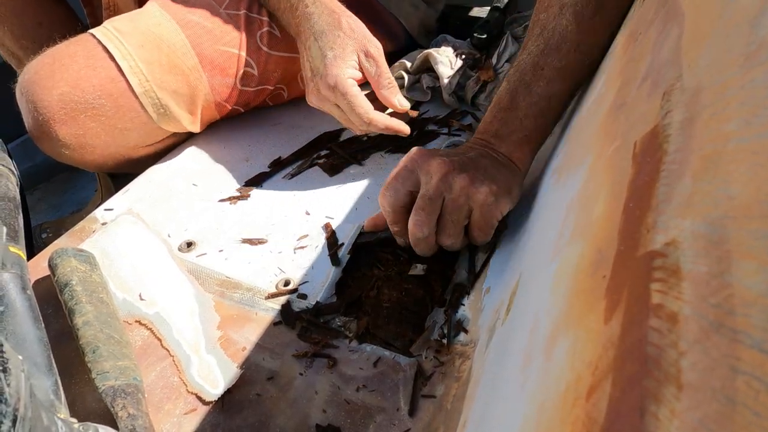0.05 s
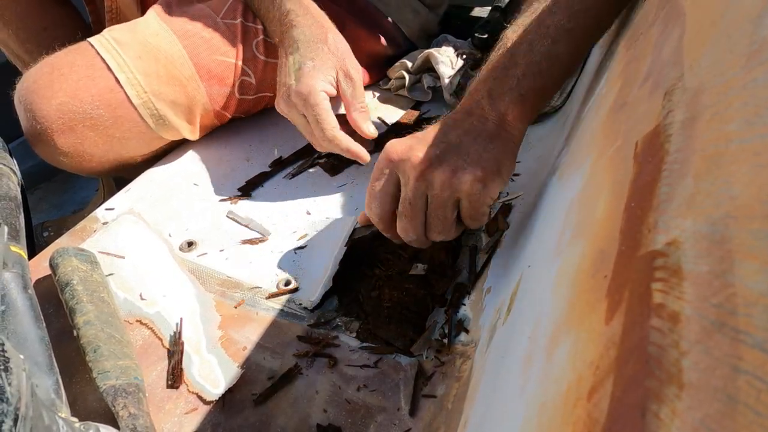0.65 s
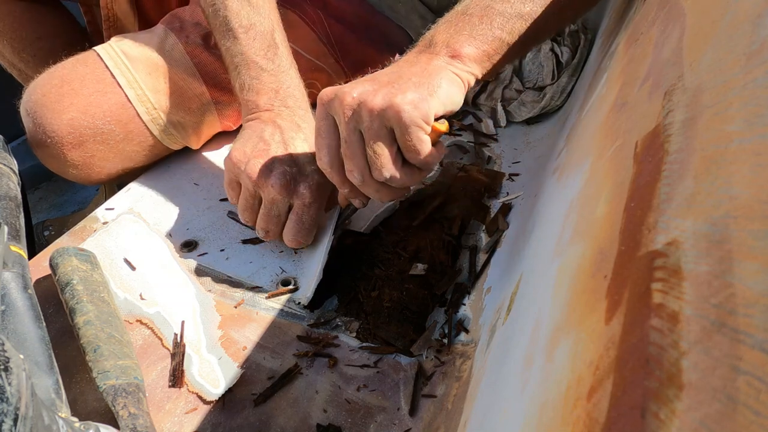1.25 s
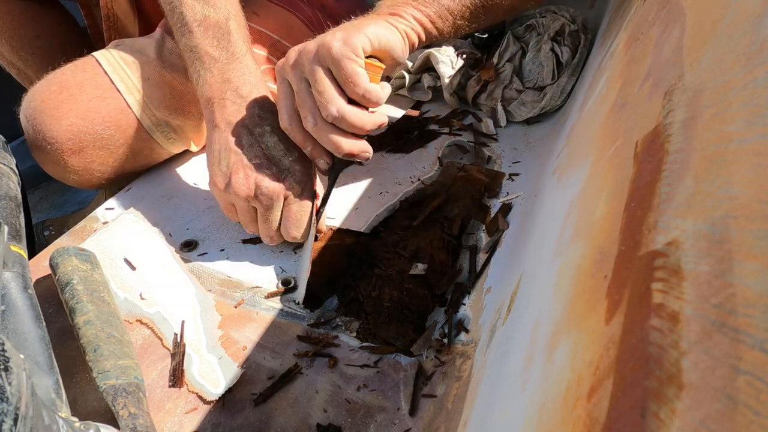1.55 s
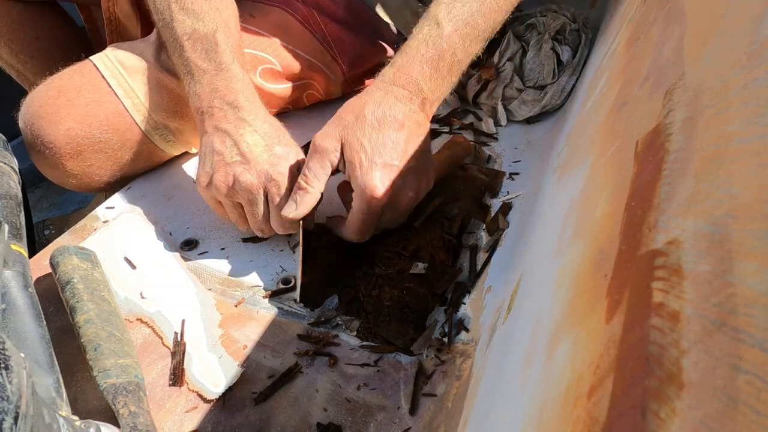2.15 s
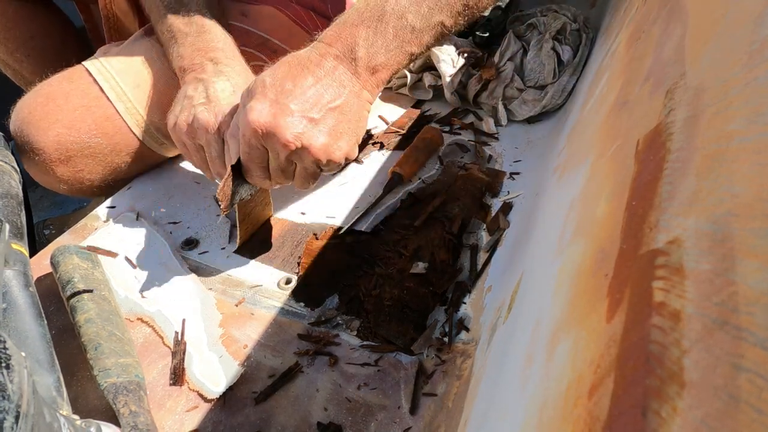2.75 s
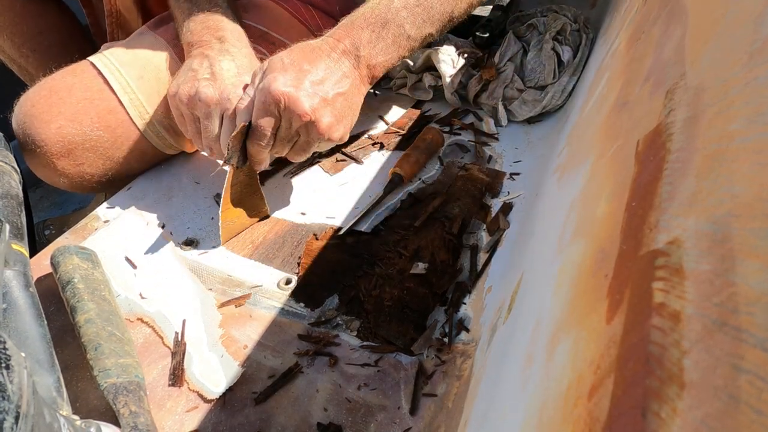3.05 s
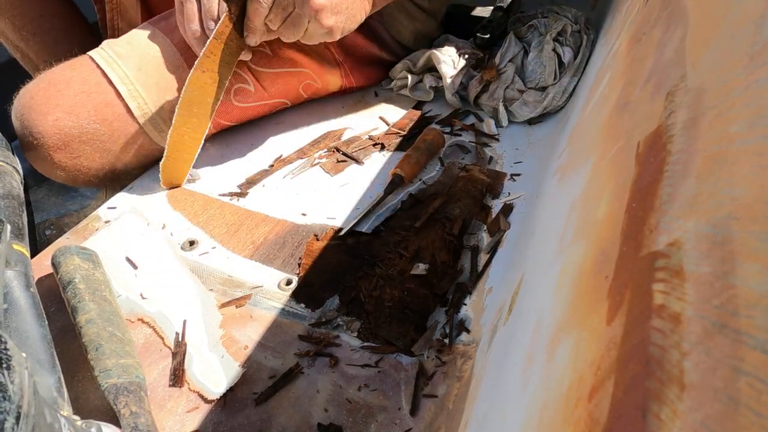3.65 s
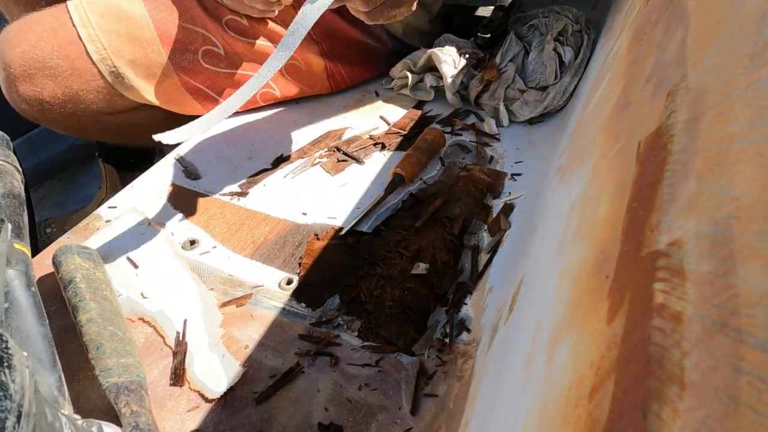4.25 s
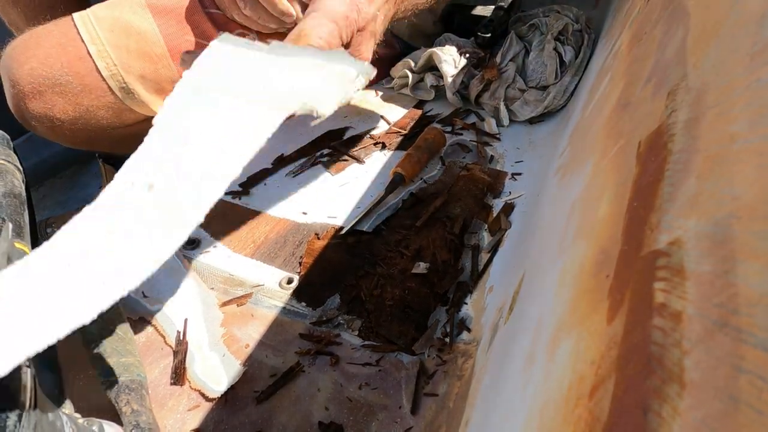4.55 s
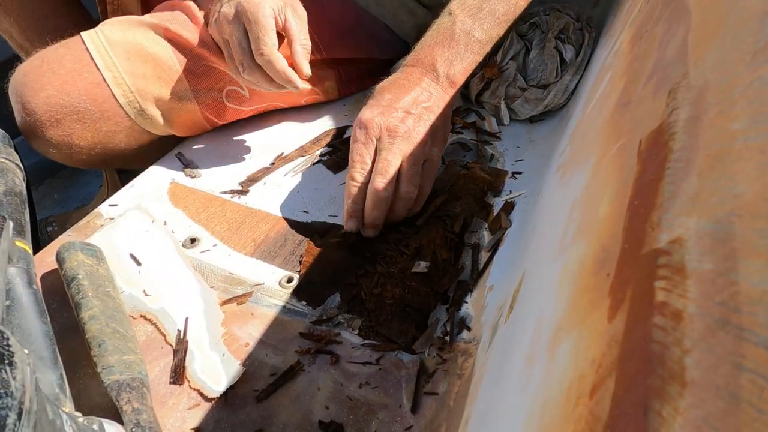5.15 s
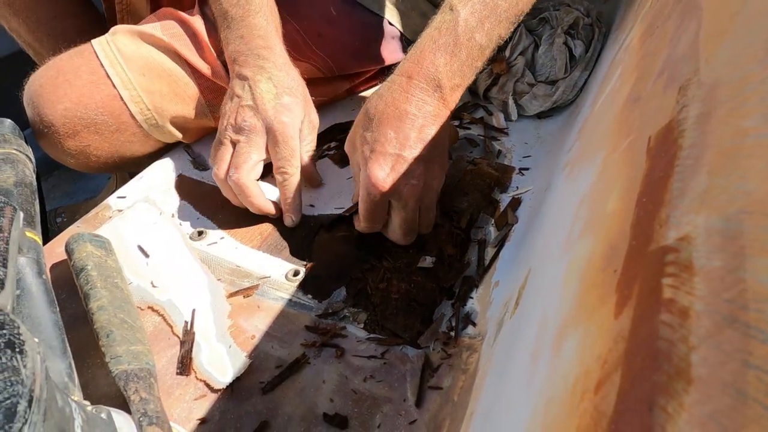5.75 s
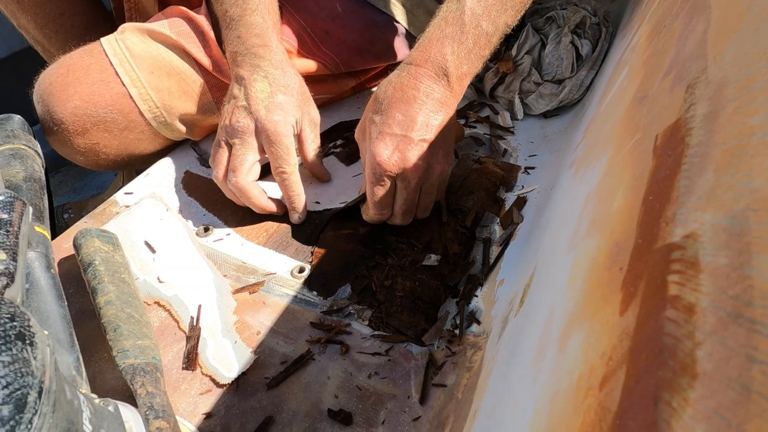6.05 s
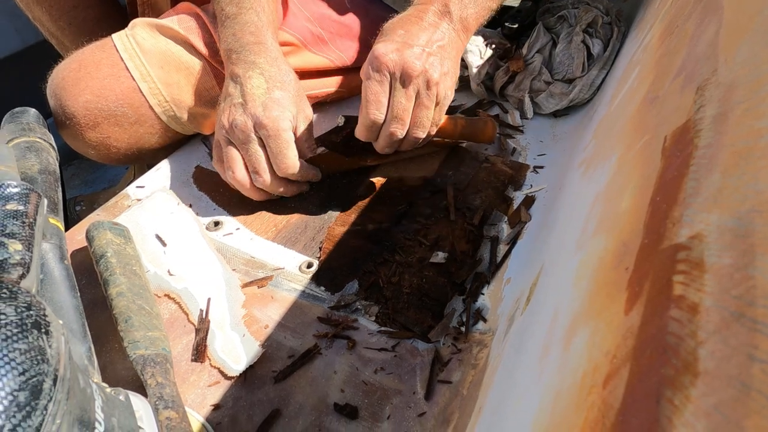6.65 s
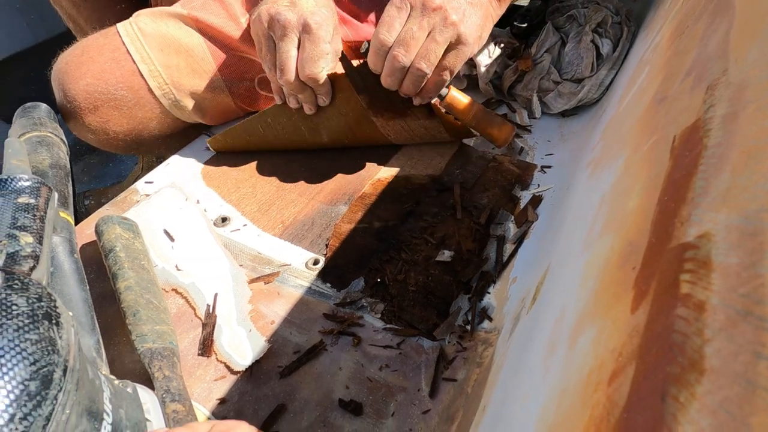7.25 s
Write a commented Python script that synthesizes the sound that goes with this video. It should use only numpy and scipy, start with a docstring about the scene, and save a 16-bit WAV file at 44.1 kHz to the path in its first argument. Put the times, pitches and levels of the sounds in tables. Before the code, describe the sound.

A hand tool pries rotten plywood off a hollow boat deck, with sharp splintering snaps, scrapes, a rattling peel and crackling rips.

```python
"""Tearing rotten plywood off a boat deck

Outdoors, with a stereo microphone close to a hand tool prying plywood off a fibreglass deck. Splinters
snap, loose pieces knock on the hollow deck and crumbs crackle in between. A strip of veneer peels off in
a fast stick-slip rattle; later a wider sheet is levered and ripped up. The deck trembles with the force
of the work, and low open-air rumble lies under it."""
import sys
import numpy as np
from scipy import signal
from scipy.fft import rfft, irfft, next_fast_len
from scipy.io import wavfile
from scipy.ndimage import uniform_filter1d

SR = 44100
rng = np.random.default_rng(int(sys.argv[2]) if len(sys.argv) > 2 else 0)


def file_out(sig):
    """Save sig as 16-bit WAV at sys.argv[1]."""
    # one column per channel
    cols = np.atleast_2d(sig).T
    # limit, then scale
    lim = np.clip(cols, -1, 1)
    pcm = np.round(lim * 32767).astype(np.int16)
    wavfile.write(sys.argv[1], SR, pcm)


N = 325883
WOOD_BAND_HZ, FIBRE_BAND_HZ, CUTOFF_HZ = (300, 2750), (2750, 16000), 16000


def from_db(db):
    """Decibels as a gain."""
    return 10 ** (np.asarray(db) / 20)


def rms_one(x, over=...):
    """Scale to an rms of 1, over all of the sound or the given part."""
    return x / np.sqrt(np.mean(x[over] ** 2) + 1e-20)


def in_time(curve):
    """The value of a curve at every sample."""
    return np.interp(np.arange(N) / SR, *np.transpose(curve))


def add(out, start_s, sound):
    """Mix a sound in at a time."""
    at = max(round(start_s * SR), 0)
    part = sound[..., :max(N - at, 0)]
    out[..., at:at + part.shape[-1]] += part


def band(x, edges_hz):
    """Band-pass between two edges."""
    return signal.sosfilt(signal.butter(3, edges_hz, "band", fs=SR, output="sos"), x + 1e-18)


def colour(x, points):
    """Causal (minimum-phase) filter with the given spectrum."""
    size = 2 * next_fast_len(x.shape[-1] // 2 + 2048)
    hz, db = np.transpose(points)
    gain_db = np.interp(np.log(np.fft.rfftfreq(size, 1 / SR) + 1), np.log(hz), db)
    cepstrum = irfft(np.log(from_db(gain_db)))
    cepstrum[1:size // 2] *= 2
    cepstrum[size // 2 + 1:] = 0
    return irfft(rfft(x, size) * np.exp(rfft(cepstrum)), size)[..., :x.shape[-1]]


def resonance(x, hz, width_hz):
    """One resonance with a gain of 1 at its peak."""
    radius = np.exp(-np.pi * width_hz / SR)
    feedback = [1, -2 * radius * np.cos(2 * np.pi * hz / SR), radius ** 2]
    return signal.lfilter(np.array([1, 0, -1]) * (1 - radius ** 2) / 2, feedback, x)


def fade(x, seconds):
    """Every click dies away exponentially."""
    return signal.lfilter([1], [1, -np.exp(-1 / (seconds * SR))], x + 1e-18)


def force(x, seconds):
    """The running rms of a sound, lingering for the given time."""
    return np.sqrt(fade(np.mean(x ** 2, axis=0), seconds) / (seconds * SR))


# Stereo width at the microphone. Each row: frequency in Hz, side against mid in dB.
WIDTH = [(40, -8), (150, -8), (450, -21), (1200, -16), (2500, -8), (5000, -6), (8000, -5), (13000, 0)]

def stereo_noise(size):
    """Noise that is narrowest in the low mids and spreads out in the treble."""
    mid, side = rng.standard_normal((2, size))
    return mid + colour(side, WIDTH) * [[1], [-1]]


# Rumble of the open air around the boat. Each row: time in seconds, relative level in dB.
RUMBLE_LEVEL = [(0.0, -38.5), (0.61, -53.5), (1.1, -47.5), (2.12, -44), (3.11, -54.5), (3.56, -39),
                (3.95, -60.5), (4.67, -51), (6.42, -43.5), (6.71, -57), (7.39, -56)]
# Tone of the rumble and of the distant hiss. Each row: frequency in Hz, gain in dB.
RUMBLE_COLOUR = [(12, -30), (25, -5), (55, 0), (110, -11.5), (170, -20.5), (350, -62)]
AIR_COLOUR = [(90, -10.5), (180, 0.5), (400, -16.5), (560, -12.5), (680, -11), (900, -13), (2500, -24.5),
              (4500, -28.5), (9000, -67), (16000, -67)]

def open_air(rumble_boost_db=5.5, hiss_db=-59):
    """Outdoor rumble swells and sinks under a faint, steady hiss from far off."""
    rumble = rms_one(colour(stereo_noise(N), RUMBLE_COLOUR))
    hiss = rms_one(colour(stereo_noise(N), AIR_COLOUR))
    return from_db(in_time(RUMBLE_LEVEL) + rumble_boost_db) * rumble + from_db(hiss_db) * hiss


def grains(per_s, spread_db):
    """Fibres give way at random moments, mostly small ones."""
    gives_way = rng.random(N) < per_s / SR
    return gives_way * from_db(spread_db * np.minimum(rng.exponential(1, N), 4))


def fractures(clicks, burst_s, tail_s, tail_db):
    """Each break is a brief burst of tiny cracks, then the wood's short rattle."""
    power = fade(clicks ** 2, burst_s) + from_db(2 * tail_db) * fade(clicks ** 2, tail_s)
    return stereo_noise(len(clicks)) * np.sqrt(power)


def wood_and_fibres(crackle, wood_db, fibre_db, even_s):
    """Share a crackle between dull wood and bright fibres, each evened out to its own level."""
    out = 0
    for edges, db in ((WOOD_BAND_HZ, wood_db), (FIBRE_BAND_HZ, fibre_db)):
        part = band(crackle, edges)
        power = uniform_filter1d(np.mean(part ** 2, axis=0), int(even_s * SR))
        out = out + part / np.sqrt(np.maximum(power, 1e-12)) * from_db(db)
    return out


# Fingers on the rotten wood, close to the microphone. Each row: time in seconds, level in dB.
FINGER_LEVEL = [(0, -52.5), (0.8, -54), (1.12, -47), (1.38, -55), (1.55, -47.5), (1.92, -52), (2.2, -48.5),
                (2.58, -51), (2.85, -64), (3.8, -55.5), (4.25, -70), (4.62, -62.5), (4.78, -41),
                (5.15, -52), (5.52, -52.5), (5.78, -50), (6.05, -53.5), (7.39, -57)]
# Tone of the crumbling. Each row: frequency in Hz, gain in dB.
CRUMB_COLOUR = [(300, -4.5), (450, -9), (660, 0), (850, -12), (1100, -7.5), (2200, -13.5), (3200, -16),
                (5000, -15), (7500, -26), (10500, -42), (13000, -55), (16000, -57.5)]

def crumbling(breaks, crumbs_db=-23.5, settle_s=0.0082, finger_fibre_db=-8.0, crumb_fibre_db=3.0):
    """A fine, uneven crackle: fingers rub the wood, and every break sheds crumbs that soon settle."""
    crackle = fractures(grains(per_s=450, spread_db=5.5), burst_s=0.000607, tail_s=0.0097, tail_db=-3)
    fingers = from_db(in_time(FINGER_LEVEL))
    crumbs = from_db(crumbs_db) * force(breaks, settle_s)
    wood_db = 20 * np.log10(np.hypot(fingers, crumbs))
    fibres = np.hypot(fingers * from_db(finger_fibre_db), crumbs * from_db(crumb_fibre_db))
    return wood_and_fibres(colour(crackle, CRUMB_COLOUR), wood_db, 20 * np.log10(fibres), even_s=0.095)


# Strokes of the blade, close up. Each row: start in seconds, length in seconds, wood level in dB,
# grit (fibres against wood) in dB.
BLADE_STROKES = [(0.004, 0.081, -42.5, -11), (0.409, 0.029, -37.5, 0), (0.916, 0.055, -47.5, -3.5),
                 (1.038, 0.06, -44, 4), (1.273, 0.054, -46.5, -4.5), (1.464, 0.072, -44.5, 5),
                 (1.784, 0.075, -46.5, 3), (2.215, 0.053, -38.5, -12), (2.313, 0.096, -36.5, -15.5),
                 (2.627, 0.046, -18, -4.5), (2.668, 0.07, -32.5, 5.5), (2.998, 0.4, -50, 3),
                 (4.019, 0.068, -58, -6), (4.667, 0.028, -37.5, -1.5), (4.766, 0.016, -30, -9),
                 (4.799, 0.013, -26, -19), (4.869, 0.021, -29, -21), (4.91, 0.077, -38.5, -13),
                 (5.3, 0.056, -55, -5), (5.578, 0.036, -52, 4), (5.771, 0.02, -45, -6.5),
                 (5.885, .02, -45.5, -21), (6.101, 0.043, -39.5, 2.5), (7.333, 0.047, -34, -8)]
# Tone of the crushed wood. Each row: frequency in Hz, gain in dB.
SCRAPE_COLOUR = [(300, 1.5), (600, -1.5), (1300, -1), (2100, -1), (3000, -12), (7000, -13), (10000, -25),
                 (14000, -27.5), (16000, -41)]

def scrapes(light_per_s=300, light_db=-43, denser=.6, swell=0.28):
    """The blade crushes a run of fibres in one short stroke, more of them the harder it presses."""
    out, t = np.zeros((2, N)), np.arange(SR // 4) / SR
    for start_s, length_s, db, grit_db in BLADE_STROKES:
        biting = t < length_s
        pressure = (np.sin(np.pi * np.minimum(t / length_s, 1)) + .02) ** swell * biting
        per_s = light_per_s * from_db(denser * (db - light_db))
        gives_way = (rng.random(len(t)) < per_s / SR) | (t == 0)
        clicks = gives_way * pressure * rng.uniform(0.43, 1, len(t))
        crush = colour(fractures(clicks, burst_s=0.0018, tail_s=0.0058, tail_db=-12), SCRAPE_COLOUR)
        for edges, band_db in ((WOOD_BAND_HZ, db), (FIBRE_BAND_HZ, db + grit_db)):
            add(out, start_s, from_db(band_db) * rms_one(band(crush, edges), over=np.s_[:, biting]))
    return out


# The hollow deck's panel modes. Each row: pitch in Hz, relative level in dB, seconds to fall 60 dB.
PANEL_MODES = [(177.2, -2.5, 0.33), (231.7, -1, 0.25), (272, 0.5, 0.15), (365.4, 5.5, .12)]
# Tone of the deck shaking under the work. Each row: frequency in Hz, gain in dB.
TREMBLE_COLOUR = [(70, -27.5), (130, -4.5), (180, 3), (215, -5), (300, -10), (365, -9), (450, -22.5),
                  (800, -49)]

def tremble(work, full_work_db=-25, full_shake_db=-37, follows=0.78, hum_db=-5.0, flex_db=-6):
    """The deck trembles and hums with the force of the work on it, and flexes under a heavy load."""
    load = force(band(work, WOOD_BAND_HZ), seconds=0.011) / from_db(full_work_db)
    shaking = rms_one(colour(stereo_noise(N), TREMBLE_COLOUR))
    modes = sum(resonance(shaking, hz, np.log(1000) / (np.pi * t60)) for hz, _, t60 in PANEL_MODES)
    hum = from_db(hum_db) * rms_one(modes)
    flex = from_db(flex_db) * rms_one(band(stereo_noise(N), edges_hz=(45, 110)))
    return from_db(full_shake_db) * (load ** follows * (shaking + hum) + load * flex)


# The deck's slow flexing and its hard clack, below and above the panel modes.
# Each row: pitch in Hz, relative level in dB, seconds to fall 60 dB.
FLEX_MODES = [(47.7, 0.5, 0.029), (75, 4.5, 0.025), (108, -1.5, 0.03)]
CLACK_MODES = [(482, -1.5, 0.071), (561, -3.5, 0.065), (649.6, 0.5, 0.079), (824, -3.5, 0.013)]
# Blows on the deck, dead centre. Each row: start in seconds, relative strength in dB, hardness in dB.
DECK_BLOWS = [(0.063, -27, 5.5), (0.077, -34.5, -13.5), (0.252, -31.5, -7.5), (0.335, -27, -5.5),
              (1.032, -47, -3), (1.449, -33, 5.5), (1.558, -32, 3), (1.781, -34, 4), (2.01, -15.5, 0.5),
              (2.348, -29, 10.5), (2.642, -28.5, -13.5), (2.672, -28.5, -11), (2.712, -30, -14),
              (2.916, -29.5, -6), (3.742, -29, -4), (4.002, -41.5, 6.5), (4.14, -55, 11.5),
              (4.771, -28.5, -1.5), (4.812, -31.5, -1), (4.899, -26, 5.5)]

def knocks(flex_db=-5.5, panel_db=-6.5, clack_db=-10.0):
    """Each blow rings the deck's modes: a soft one flexes it, a hard one clacks."""
    out, t = np.zeros(N), np.arange(SR // 3) / SR
    for start_s, db, hardness_db in DECK_BLOWS:
        shares_db = (flex_db - hardness_db, panel_db, clack_db + hardness_db)
        for modes, share_db in zip((FLEX_MODES, PANEL_MODES, CLACK_MODES), shares_db):
            hz, mode_db, t60 = np.transpose(modes)[:, :, None]
            detune = 1 + 0.03 * rng.standard_normal((len(modes), 1))   # from the hands' pressure
            rings = from_db(mode_db - 60 * t / t60) * np.sin(2 * np.pi * hz * detune * t)
            polarity = (-1) ** np.arange(1, len(modes) + 1)
            add(out, start_s, from_db(db + share_db) * rms_one(polarity @ rings, over=t < .03))
    return out


# Splinters breaking close to the microphone.
# Each row: start in seconds, ring pitch in Hz, level of the crack in dB, edge against crack in dB.
SPLINTERS = [(0.0762, 5260, -23, 0.5), (0.1869, 2280, -10.5, -10.5), (0.216, 2400, -25, -2),
             (0.236, 5300, -29.5, 4), (0.251, 4970, -23, 0), (0.259, 2440, -21, -3),
             (0.2945, 5200, -24, 6.5), (0.308, 4900, -24, 4), (0.314, 4900, -24.5, 1),
             (0.334, 1600, -19, -3), (0.457, 7700, -34, 5), (0.463, 1940, -19.5, -16),
             (0.52, 1750, -37.5, -16), (0.604, 1530, -32.5, -23), (0.62, 4030, -26.5, -8),
             (0.65, 5600, -40, 4.5), (0.676, 4970, -42, 5), (0.752, 5600, -45.5, 7.5),
             (0.869, 5150, -23.5, -4), (1.447, 2000, -22.5, -5), (1.51, 7200, -34, 15.5),
             (1.522, 6900, -40, 15), (1.557, 2300, -18, -5.5), (1.6, 5600, -38, 6.5),
             (1.6821, 2190, -15.5, -5.5), (1.744, 2160, -25.5, -3), (1.75, 2100, -19.5, -2.5),
             (1.78, 2040, -17, -3.5), (1.803, 5740, -26.5, 2), (1.963, 1830, -28.5, -30),
             (1.977, 3900, -30.5, -6), (2.013, 980, -30, -2.5), (2.102, 1100, -34, -20),
             (2.63, 1730, -16, -29), (2.652, 2165, -14, -24), (2.674, 1930, -18.5, -1),
             (2.709, 3500, -19, -16), (2.722, 3000, -21, -5), (2.733, 6060, -27.5, -2),
             (2.842, 4900, -49.5, 2), (3.611, 5320, -28, 6), (4.003, 1100, -47.5, -25),
             (4.813, 1086, -18.5, -27.5), (4.815, 2680, -19.5, -30), (4.898, 1380, -19, -31),
             (5.592, 2440, -20.5, -11.5), (5.665, 2520, -37, -11.5), (5.756, 2360, -31.5, -15),
             (6.12, 2470, -18, -13), (6.124, 2120, -15, -9.5), (6.151, 2400, -16, -13),
             (6.179, 2270, -17.5, -10), (6.222, 2090, -17, -8.5), (6.258, 2060, -22, -15),
             (6.287, 1860, -15.5, -12), (6.325, 1360, -15.5, -12), (6.343, 3940, -19.5, -22),
             (6.433, 3180, -19, -11), (6.439, 4400, -18, -13), (6.448, 3960, -18, -16),
             (6.457, 3100, -16, -9), (6.479, 3040, -18.5, -8), (6.509, 2780, -17, -8),
             (6.518, 1270, -22, -2), (6.568, 3120, -17.5, -3), (6.929, 2670, -19.5, -6),
             (7.126, 1410, -21.5, -5), (7.175, 2520, -21.5, -21), (7.272, 2230, -23, -3.5),
             (7.358, 960, -23, -18)]
# A snap's body, crack and bright edge. Each row: lower limit in Hz, upper limit in Hz.
SNAP_BANDS = [(350, 1200), (1200, 3600), (3600, 16000)]
# Thick, low-ringing splinters have the most body. Each row: ring pitch in Hz, body against crack in dB.
SNAP_BODY = [(1000, 2.5), (1500, -2.5), (2100, -6), (3000, -22.5), (5000, -11), (7500, -0.5)]
# Tone of the break itself. Each row: frequency in Hz, gain in dB.
SNAP_COLOUR = [(300, -1.5), (650, -3), (1250, 2.5), (2200, 1), (3500, 0), (6500, 2), (9000, -9),
               (13000, -12.5), (16000, -29.5)]
GRIP_S, GRIP_BODY_DB = 5.5, -7.5   # from then on a hand holds the sheet and damps each snap's body

def snaps(rows, ring_db=13.0, ring_width_hz=350, overtone_db=-1.5, lead_in_db=-21):
    """A splinter breaks within a millisecond and rings briefly at its own pitch."""
    out, t = np.zeros((2, N)), np.arange(-SR // 100, SR // 16) / SR
    attack = np.s_[:, (t > -.001) & (t < .004)]   # the levels hold for these 5 ms
    # A faint noise swells just before each snap.
    lead_in = from_db(lead_in_db) * np.exp(-np.abs(t) / .002) * (t < 0)
    for start_s, hz, db, edge_db in rows:
        burst = fractures(1. * (t == 0), burst_s=0.00058, tail_s=0.0031, tail_db=-14.5)
        crack = colour(burst + lead_in * stereo_noise(len(t)), SNAP_COLOUR)
        overtone_hz = min(2 * hz * rng.uniform(.86, 1.14), CUTOFF_HZ)
        ring = from_db(ring_db) * resonance(crack, hz, ring_width_hz)
        ring += from_db(overtone_db) * resonance(crack, overtone_hz, ring_width_hz)
        body_db = np.interp(hz, *np.transpose(SNAP_BODY)) + GRIP_BODY_DB * (start_s > GRIP_S)
        for edges, share_db in zip(SNAP_BANDS, (body_db, 0, edge_db)):
            part = rms_one(band(crack + ring, edges), over=attack)
            add(out, start_s + t[0], from_db(db + share_db) * part)
    return out


# The veneer strip first lets go in single, quickening jerks. Each entry: start in seconds.
JERKS_S = [2.915, 2.957, 3.011, 3.052, 3.082, 3.115, 3.148, 3.187, 3.2]

def jerks(ring_hz=5600, db=-26.5, edge_db=4.5, tick_after_s=.017, tick_db=-15):
    """Each jerk snaps a thin, bright splinter, and a weaker tick follows as the strip sticks again."""
    rows = []
    for start_s in JERKS_S:
        detune, wait, strength = rng.standard_normal(3)
        hz = ring_hz * np.exp(0.14 * detune)
        tick_s = start_s + tick_after_s * np.exp(0.15 * wait)
        rows += [(start_s, hz, db, edge_db), (tick_s, hz, db + tick_db + 3 * strength, edge_db)]
    return snaps(rows, ring_db=1.5, ring_width_hz=680, lead_in_db=-15.5)


# Speed of the pull once the strip runs freely. Each row: time in seconds, slips per second.
PULL_SPEED = [(3.19, 60), (3.24, 98.5), (3.32, 144), (3.40, 139), (3.50, 81), (3.68, 86), (3.80, 113)]
# Tone of the slipping veneer. Each row: frequency in Hz, gain in dB.
PEEL_COLOUR = [(180, -34), (300, -24), (385, -10), (486, -14), (1100, -3.5), (1900, -6), (2740, -11),
               (5520, -9), (7440, -10.5), (9390, -24.5), (12100, -26), (14000, -30.5), (16000, -54.5)]

def stick_slip(start_s, end_s, even_per_s=42, slip_spread_db=0.5):
    """The strip sticks and slips, less evenly the faster it is pulled."""
    per_s = in_time(PULL_SPEED)
    uneven = .0047 * (per_s - even_per_s)
    clicks, at = np.zeros(N), round(start_s * SR)
    while at < end_s * SR:
        wait, strength = rng.standard_normal(2)
        clicks[at] = from_db(slip_spread_db * strength)
        at += int(SR / per_s[at] * np.exp(uneven[at] * wait)) + 1
    return colour(fractures(clicks, burst_s=0.0011, tail_s=0.0098, tail_db=-14.5), PEEL_COLOUR)


def peel(start_s=3.19, end_s=3.772, attack_s=.025, release_s=0.011, taut_at_s=3.406, taut_for_s=0.13):
    """Each slip runs up the strip's free length and back, returning later as the strip grows."""
    n, t = np.arange(N), np.arange(N) / SR
    taut = np.exp(-.5 * ((t - taut_at_s) / taut_for_s) ** 2)
    echo = 0.48 + 0.18 * taut   # more comes back along a taut strip
    trip_s = 0.001333 + 0.00311 * np.maximum(t - start_s, 0)
    # Only the middle range survives the trip, so the second and third resonances sing.
    survives = signal.butter(1, [750, 1750], "band", fs=SR, output="sos")
    wave = rattle = stick_slip(start_s + attack_s, end_s)
    for _ in range(5):
        returning = signal.sosfilt(survives, wave + 1e-18)
        wave = echo * np.array([np.interp(n - SR * trip_s, n, side) for side in returning])
        rattle = rattle + wave
    envelope = np.clip((t - start_s) / attack_s, 0, 1) * np.exp(-np.maximum(t - end_s, 0) / release_s)
    return envelope * wood_and_fibres(rattle, wood_db=-30 + 6 * taut, fibre_db=-26, even_s=0.0222)


# Resonances of the wide sheet as it lifts. Each row: pitch in Hz, width in Hz.
SHEET_MODES = [(1080, 130), (2780, 8), (4200, 110), (4980, 160), (7300, 37)]

def sheet_ring(breaks, ring_db):
    """The half-freed sheet rings with whatever breaks under it."""
    return from_db(ring_db) * sum(resonance(breaks + 1e-18, hz, width) for hz, width in SHEET_MODES)


# Tone of the tearing under the sheet. Each row: frequency in Hz, gain in dB.
TEAR_COLOUR = [(300, -2.5), (700, 2.5), (1150, 2), (1900, -1.5), (2900, -2), (5000, -11.5), (8000, -12),
               (10500, -29.5), (13500, -20), (16000, -34)]

def tearing(effort, per_s, spread_db, ring_db, fibre_db, fibre_follows):
    """Hundreds of fibres a second let go under the wide sheet, which rings faintly."""
    t = np.arange(N) / SR
    pulling = (t >= effort[0][0]) & (t <= effort[-1][0])
    crackle = fractures(grains(per_s, spread_db), burst_s=.0006, tail_s=.0035, tail_db=-10)
    crackle = colour(crackle, TEAR_COLOUR)
    crackle += sheet_ring(crackle, ring_db)
    wood_db = in_time(effort)
    peak_db = wood_db.max()
    bright_db = peak_db + fibre_db + fibre_follows * (wood_db - peak_db)
    return pulling * wood_and_fibres(crackle, wood_db, bright_db, even_s=0.06)


# The tool levering under the sheet. Each row: time in seconds, wood level in dB.
LEVER_EFFORT = [(6.05, -86), (6.11, -46), (6.26, -48), (6.35, -32.5), (6.45, -38.5), (6.53, -35.5),
                (6.70, -51), (6.75, -79)]

def levering():
    """The glue line cracks with a sparse, bright crackle."""
    return tearing(LEVER_EFFORT, per_s=210, spread_db=3.5, ring_db=4, fibre_db=5, fibre_follows=1)


# The sheet coming off the deck. Each row: time in seconds, wood level in dB.
RIP_EFFORT = [(6.75, -56.5), (6.805, -50), (6.825, -38), (6.90, -29.5), (6.98, -34.5), (7.14, -24.5),
              (7.22, -29), (7.24, -50), (7.31, -51)]

def ripping():
    """The sheet tears loose in a dense crackle; a harder pull sounds woodier."""
    return tearing(RIP_EFFORT, per_s=580, spread_db=2.5, ring_db=-3.5, fibre_db=-2, fibre_follows=0.75)


# Where the work sits before the microphone, about centre to slightly left.
# Each row: time in seconds, left against right in dB.
WORK_PAN = [(0, .8), (.7, 2.0), (1.8, 1.2), (2.2, .3), (2.7, 0), (3.1, 2.2), (3.8, 2.4), (4.6, 0),
            (7.39, -.2)]

def scene(lever_push_db=7, rip_push_db=-4):
    """The wood close up, the deck under it and the open air all round."""
    splinters = snaps(SPLINTERS) + jerks()
    lever, rip = levering(), ripping()
    rubbing = scrapes() + peel() + crumbling(splinters)
    gripped = np.arange(N) / SR > GRIP_S
    wood = splinters + sheet_ring(splinters * gripped, ring_db=2) + rubbing + lever + rip
    # Levering bears down on the deck; ripping lifts off it.
    work = rubbing + from_db(lever_push_db) * lever + from_db(rip_push_db) * rip
    deck = knocks() + tremble(work)
    pan = from_db(in_time(WORK_PAN) * np.array([[.5], [-.5]]))
    return wood * pan + deck + open_air()


def record(dry):
    """Peaks at the microphone clip at full scale, and the top of the treble is cut steeply."""
    low_pass = signal.ellip(10, .1, 80, CUTOFF_HZ, fs=SR, output="sos")
    return signal.sosfilt(low_pass, np.clip(dry, -1, 1))


dry = scene()
out = record(dry)
file_out(out)
```